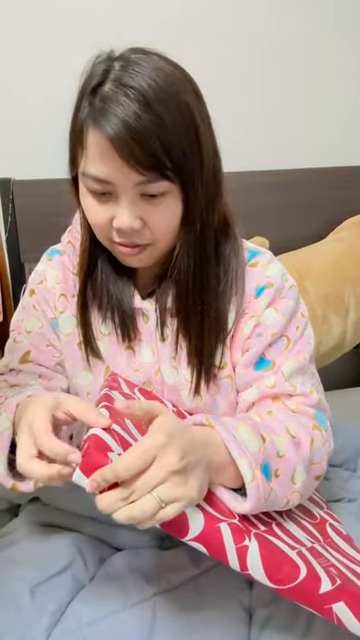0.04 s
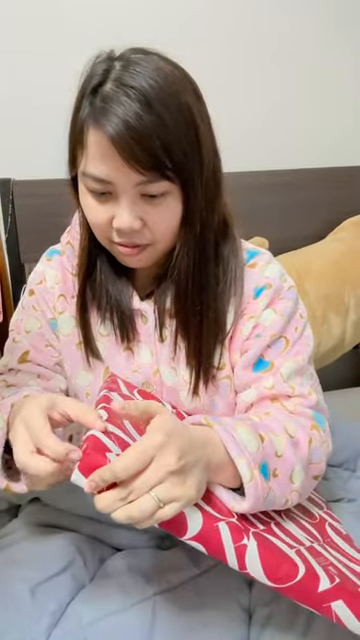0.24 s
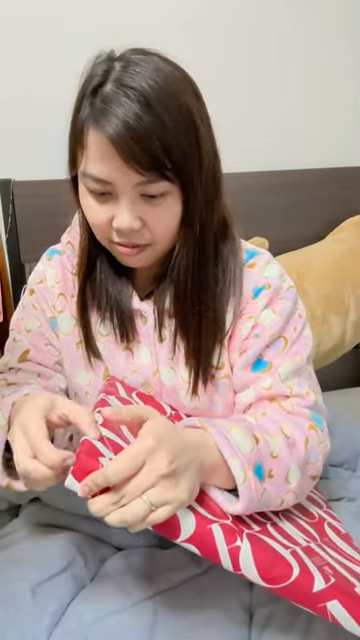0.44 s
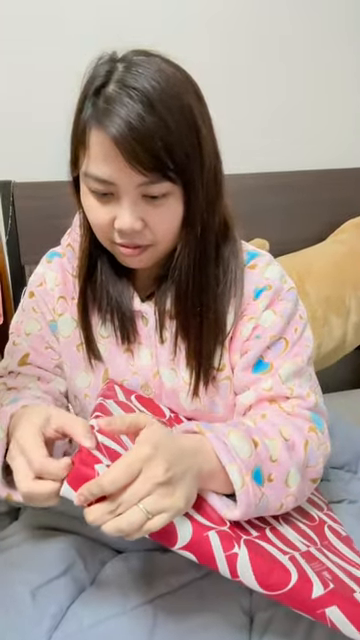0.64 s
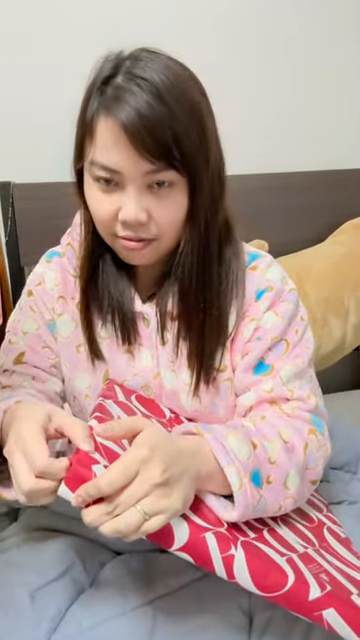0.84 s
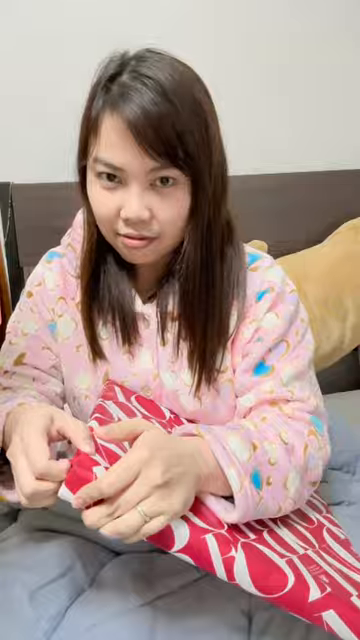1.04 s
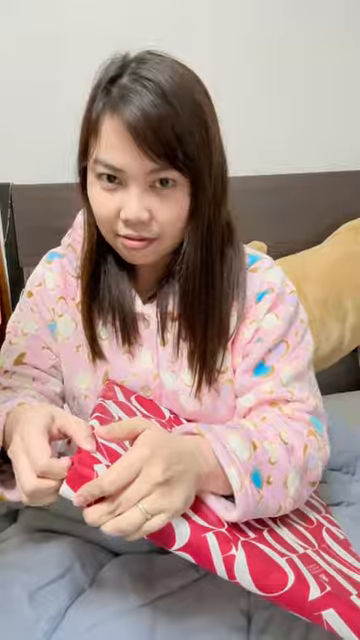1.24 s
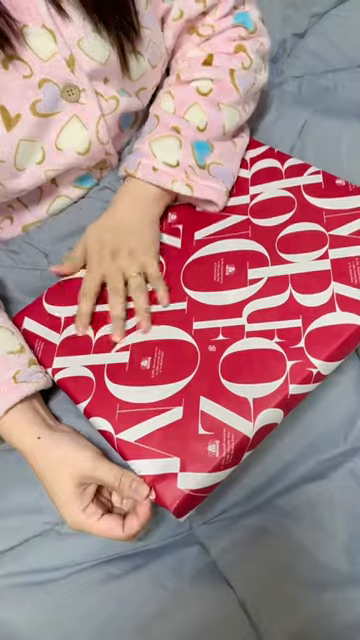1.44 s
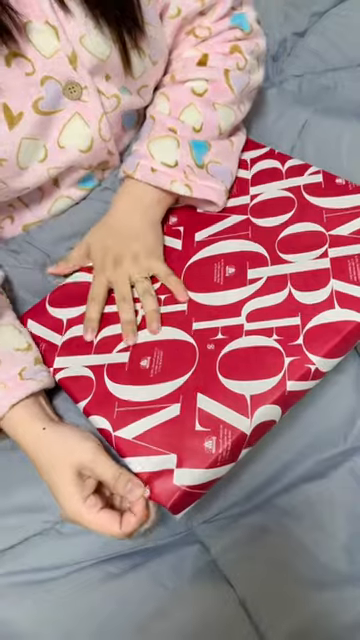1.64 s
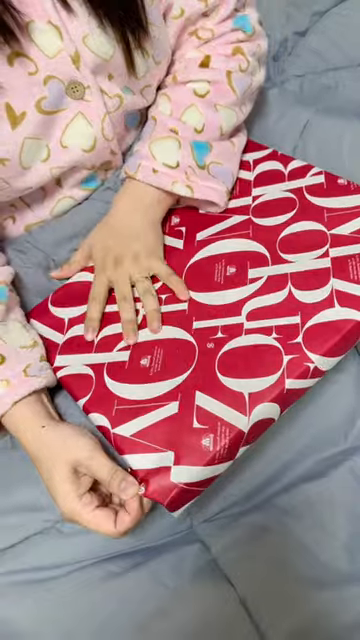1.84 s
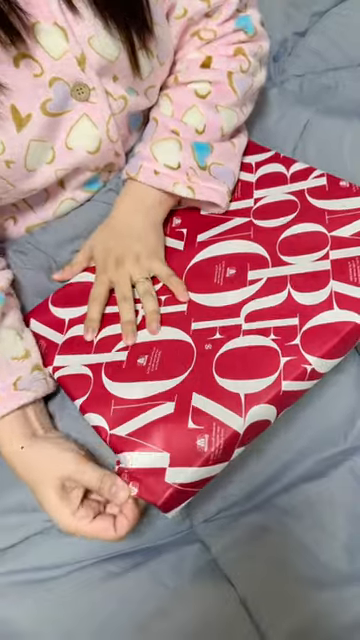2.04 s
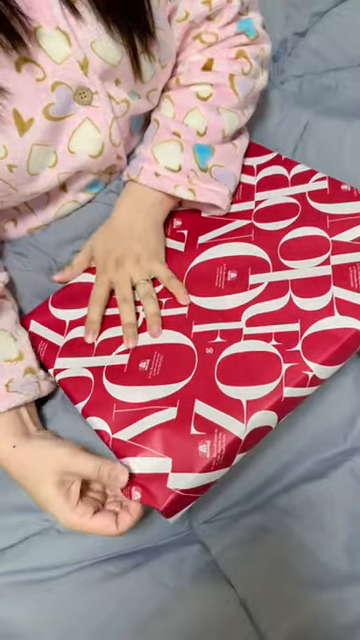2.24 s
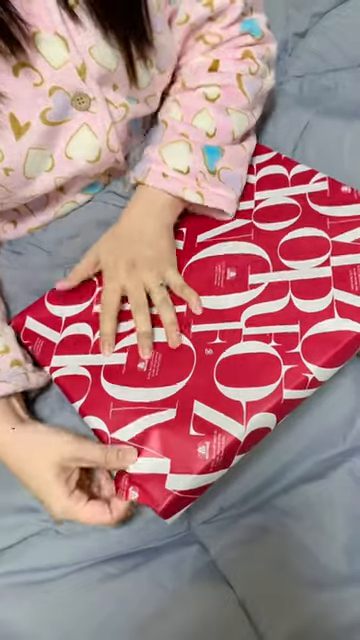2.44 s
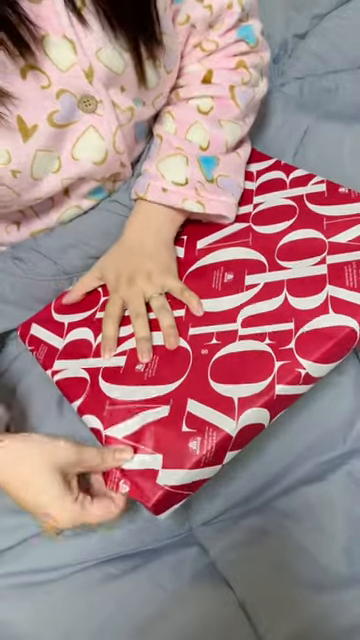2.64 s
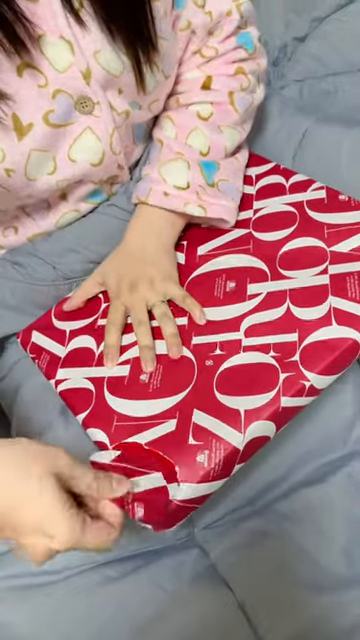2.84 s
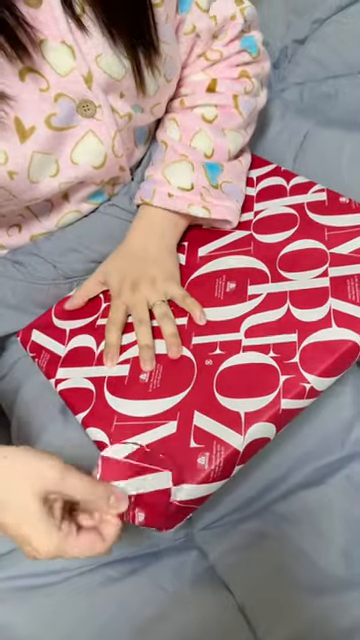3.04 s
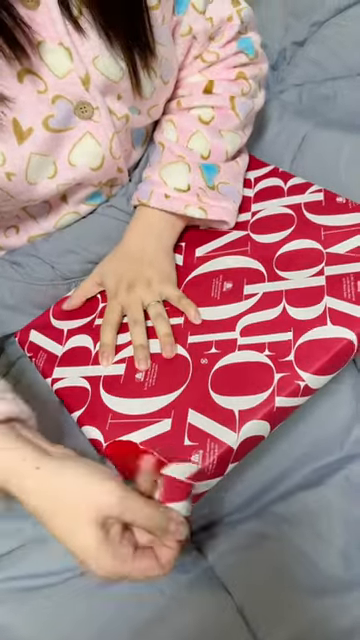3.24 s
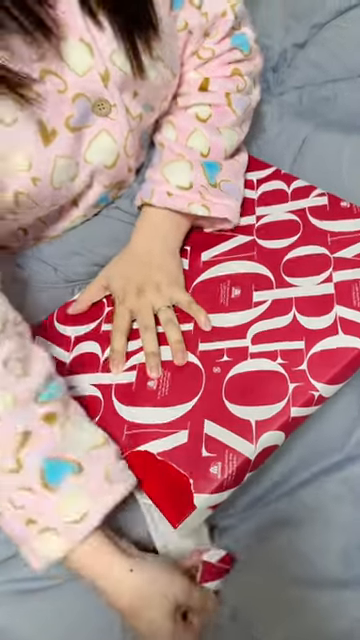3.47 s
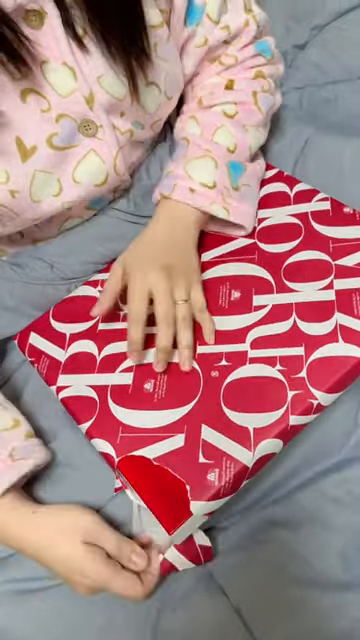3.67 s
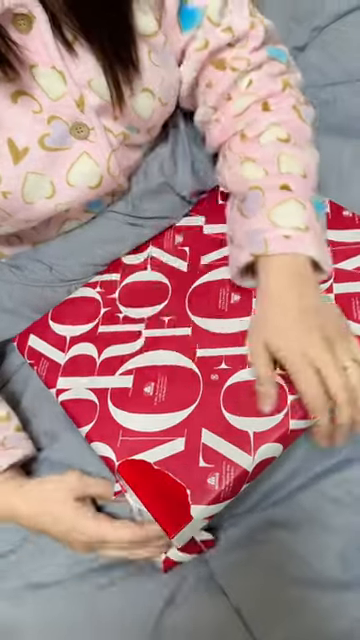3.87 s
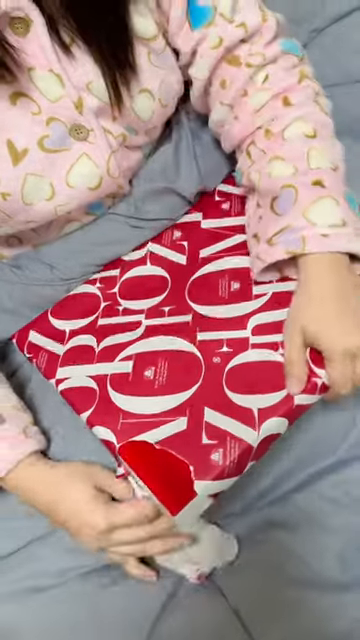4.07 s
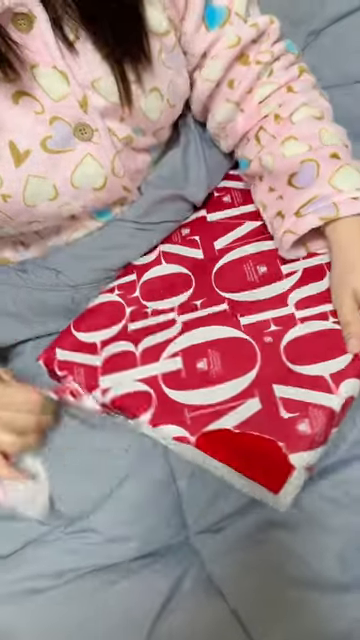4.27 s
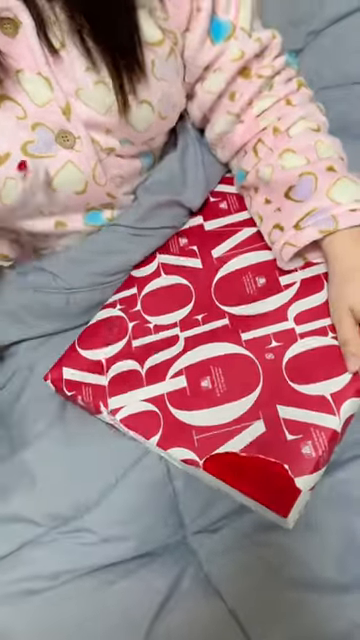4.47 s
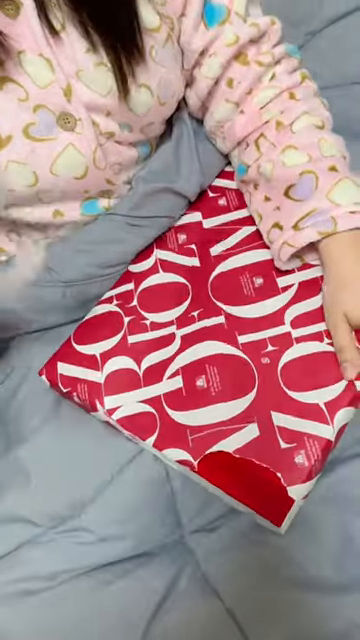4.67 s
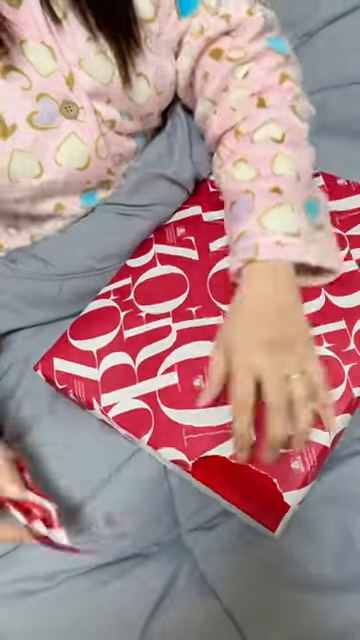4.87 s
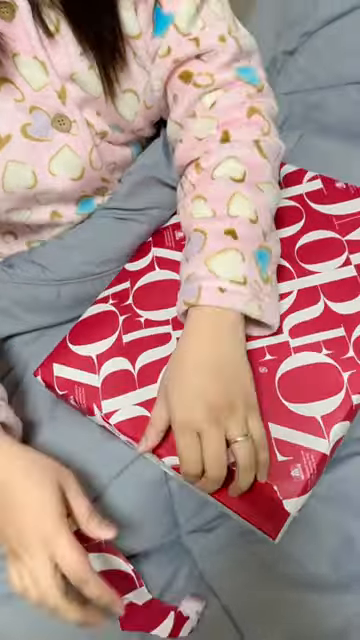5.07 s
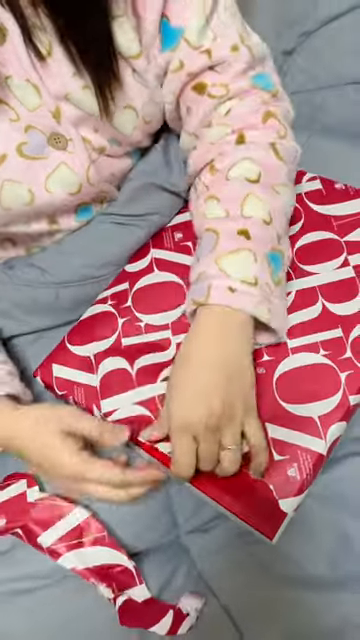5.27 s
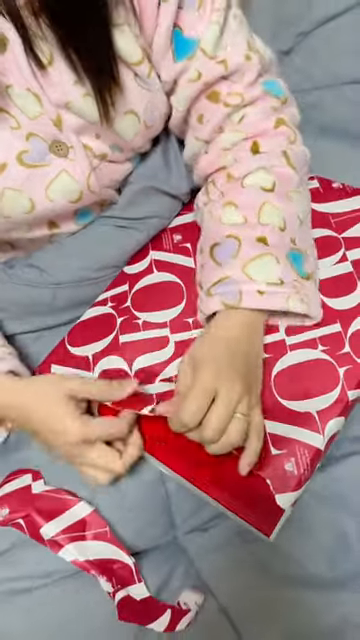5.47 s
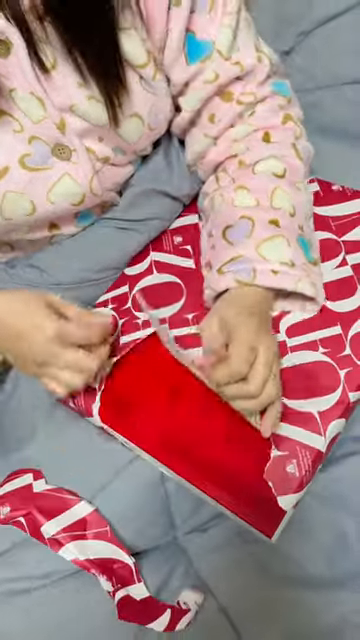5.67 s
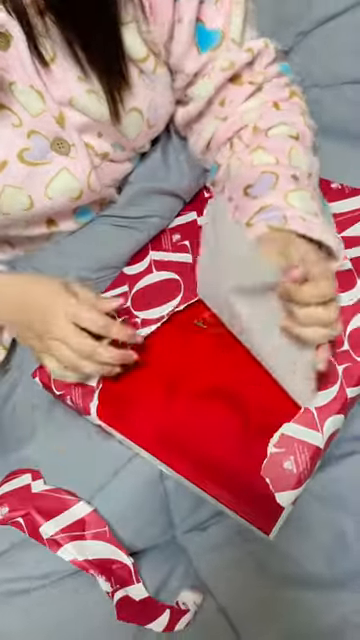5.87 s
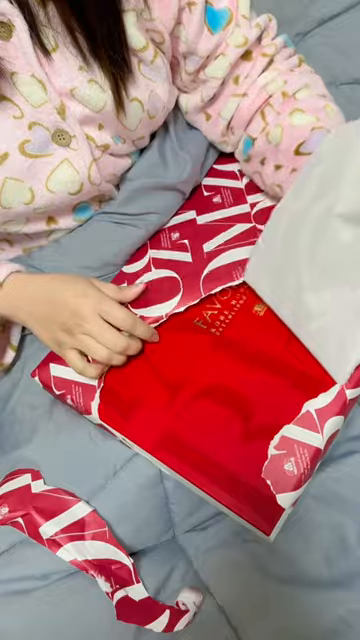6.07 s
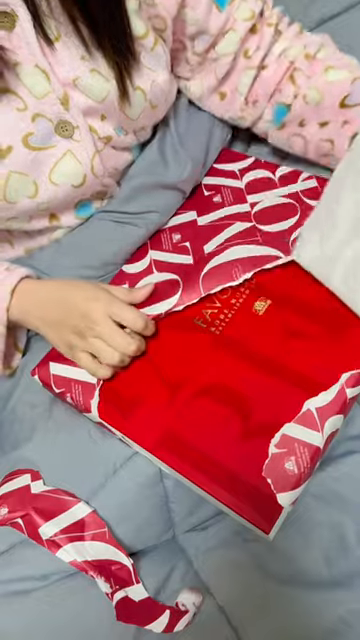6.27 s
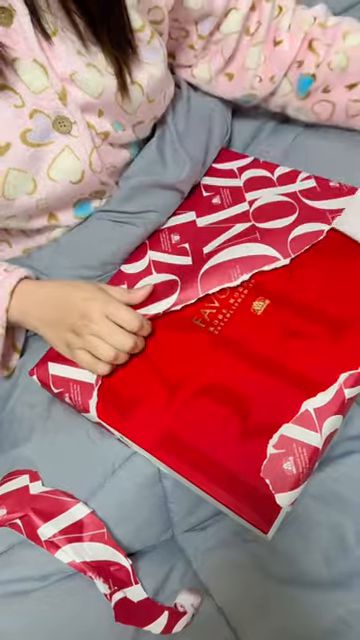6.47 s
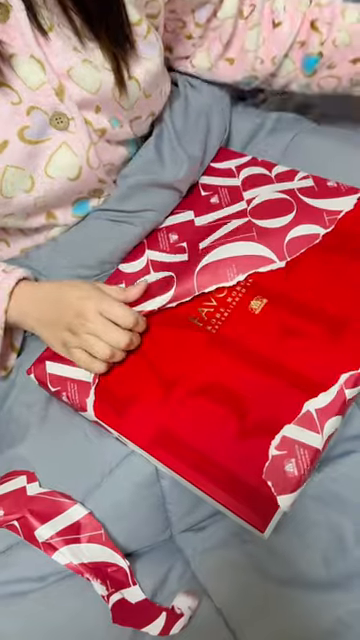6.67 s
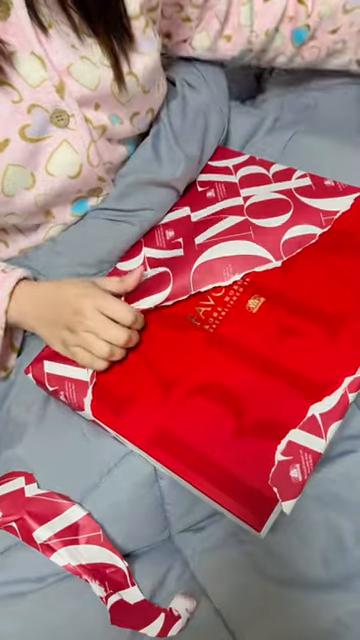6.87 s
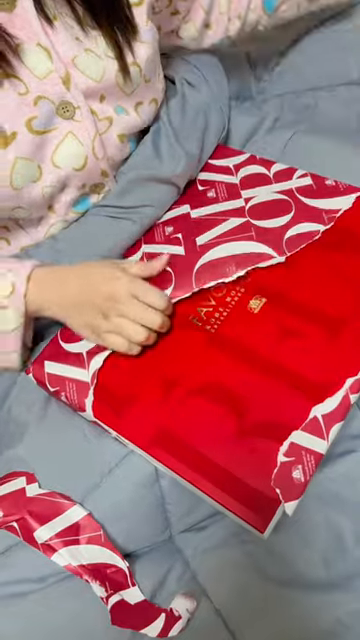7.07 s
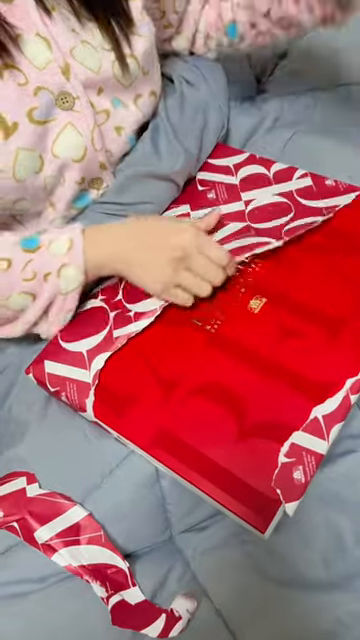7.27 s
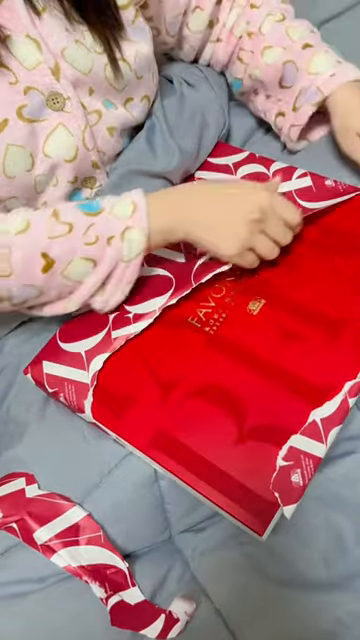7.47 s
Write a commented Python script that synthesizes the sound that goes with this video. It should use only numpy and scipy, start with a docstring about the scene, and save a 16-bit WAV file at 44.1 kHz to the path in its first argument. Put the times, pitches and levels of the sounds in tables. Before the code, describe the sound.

Fingers crinkle and pick at stiff wrapping paper on a cardboard box, then rip it in short bursts and one long tear in a quiet room.

```python
"""A dry room with a bed and soft walls: fingers pick at the wrapping paper on a flat cardboard box,
then tear it off in short and long rips. Fibres break as dense grains of noise, creases snap as ticks
with a short ring, and the box booms and knocks through low resonances, over a low building murmur.
A two-port microphone hears it from the side first, then, after a very short silence, from above."""
import sys
import numpy as np
from scipy import signal
from scipy.fft import rfft, irfft, next_fast_len
from scipy.io import wavfile
from scipy.ndimage import uniform_filter1d

SR = 44100
rng = np.random.default_rng(int(sys.argv[2]) if len(sys.argv) > 2 else 0)


def to_wav(sig):
    """Store sig (one row per channel, or 1-D mono) as 16-bit WAV at the path in sys.argv[1].

    Samples outside -1..1 are clipped; the rate is SR.
    """
    pcm = np.clip(np.atleast_2d(sig), -1, 1) * 32767
    pcm = np.round(pcm).astype(np.int16)
    wavfile.write(sys.argv[1], SR, pcm.T)  # frames by channels


N = 331191
SIZE = next_fast_len(N + SR)   # FFT length, with room for tails
CUTOFF_HZ = 16300   # top of the sound

# Borders between the parts: box below BOX_HZ, slack sheet up to SLACK_HZ, tight sheet up to HISS_HZ,
# single fibres above that
BOX_HZ, SLACK_HZ, HISS_HZ = 545, 1465, 6050
STRIP_DB, UPPER_DB = 5, 0   # usual lift of the loudest region and of the upper patch


def from_db(db):
    """Turns a level in dB into a gain."""
    return 10 ** (np.asarray(db) / 20)


def rms_one(x):
    """Scales a signal to unit power."""
    return x / np.sqrt(np.mean(x ** 2) + 1e-20)


def over_hz(rows):
    """Reads the columns of a frequency table at every FFT bin, evenly along pitch."""
    hz, *columns = np.transpose(rows)
    bins = np.log(np.maximum(np.fft.rfftfreq(SIZE, 1 / SR), 1))
    return [np.interp(bins, np.log(hz), c) for c in columns]


def over_time(t, rows):
    """Reads the columns of a time table at the times t."""
    s, *columns = np.transpose(rows)
    return [np.interp(t, s, c) for c in columns]


def causal(db):
    """Makes a filter with this level curve that never sounds early (minimum phase)."""
    cepstrum = irfft(db * np.log(10) / 20, SIZE)
    cepstrum[1:SIZE // 2] *= 2
    cepstrum[SIZE // 2 + 1:] = 0
    return np.exp(rfft(cepstrum))


def band(x, hz, kind):
    """Keeps one frequency range, with a third-order Butterworth design."""
    return signal.sosfilt(signal.butter(3, hz, kind, fs=SR, output="sos"), x)


def resonance(x, hz, width_hz):
    """Rings at one pitch like a damped spring: two poles, gain about 1 at the top."""
    r = np.exp(-np.pi * width_hz / SR)
    top = (1 - r * r) / 2
    return signal.lfilter([top, 0, -top], [1, -2 * r * np.cos(2 * np.pi * hz / SR), r * r], x + 1e-18)


def drift(rate):
    """Smoothed noise of rms 1; a higher rate wanders faster."""
    size = round(SR / rate / 4)
    once = uniform_filter1d(rng.standard_normal(N), size=size)
    return rms_one(uniform_filter1d(once, size=size))


def patchy(x, low_hz, high_hz, patchy_db):
    """Four neighbouring bands, each swelling and fading on its own as the folds move."""
    edges = np.geomspace(low_hz, high_hz, num=5)
    return sum(from_db(patchy_db * drift(14)) * band(x, [low, high], "band")
               for low, high in zip(edges, edges[1:]))


def swell_db(t, s, swell_s, hold_s, fade_s):
    """Level under the top of a gesture: straight up in dB, flat, straight down."""
    range_db = 29.5   # covered in one swell or fade time; the slopes then go on
    before = (s - t) / max(swell_s, .002)
    after = (t - s - hold_s) / max(fade_s, .002)
    return -range_db * np.maximum(np.maximum(before, after), 0)


def rumble():
    """The low murmur of the building: shaped noise, nearly the same at both ports."""
    # Shape of the murmur: (frequency [Hz], relative level [dB])
    murmur_shape = [(15, -55.5), (25, -31), (42, -9), (64, -9), (85, -21), (134, -18), (900, -43),
                    (1170, -68), (1980, -120)]
    level_db, = over_hz(murmur_shape)
    noise = rfft(rng.standard_normal((2, N)), SIZE)
    common, apart = irfft(noise * from_db(level_db), SIZE)[:, :N]
    return from_db(-73.5) * rms_one(common + .15 * apart * [[1], [-1]])


def fumbling(t):
    """Fingers fumble at the wrapping: the rustle level wanders and is never switched off."""
    # Path of the fumbling, before the layer gains in rustle():
    # (time [s], rustle level [dB], box boom over rustle [dB], fibre hiss over rustle [dB])
    fumble_path = [(0.0, -67.5, 4, -15), (0.39, -62, -0.5, -12.5), (0.599, -60, 1, -15),
                   (0.86, -75, -2.5, -12.5), (1.35, -82, 4, -14), (1.37, -59, -7.5, -7),
                   (1.74, -64.5, -1.5, 8), (1.93, -70, -7, -3), (2.157, -69.5, -14, -5),
                   (2.36, -57.5, 0, -4), (2.57, -56.5, 5, 3.5), (2.798, -51.5, 11.5, -4),
                   (3.0, -73.5, -31, -19), (3.22, -70, 9, -24), (3.46, -49.5, 6.5, -6),
                   (3.7, -56, -0.5, 0.5), (3.83, -63.5, -1.5, -1), (3.92, -51.5, -3, 1.5),
                   (4.05, -54, -11, -1), (4.52, -61.5, 5, -4), (4.65, -54.5, -2, -16), (4.87, -66.5, 0, -3),
                   (5.09, -67.5, 6.5, -5), (5.15, -49.5, -2, 0), (5.24, -63, 6.5, -2),
                   (5.38, -55.5, -9.5, -11), (6.75, -47.5, 4.5, -22), (6.95, -66, -4, -7),
                   (7.06, -54.5, -1.5, 1.5), (7.24, -47.5, -11, -4), (7.35, -47, -13, -5),
                   (7.51, -44, -7, -7)]
    # Where the sheet sounds loudest under the fingers: (time [s], frequency [Hz])
    finger_region = [(0.0, 2300), (0.6, 3880), (1.0, 2200), (1.4, 4130), (1.75, 3220), (2.6, 3420),
                     (2.95, 2120), (3.5, 2900), (3.95, 2310), (4.45, 4000), (4.6, 2600), (5.2, 3200),
                     (6.95, 2320), (7.5, 2800)]
    level_db, boom_db, hiss_db = over_time(t, fumble_path)
    region_hz, = over_time(t, finger_region)
    return dict(level_db=level_db, region_hz=region_hz, grain_db=2, slack_db=-9.5, boom_db=boom_db,
                hiss_db=hiss_db, thud_db=-15, strip_db=STRIP_DB, upper_db=UPPER_DB)


def fibres(grain_db, clumps):
    """Fibres break at random with uneven force, in clumps; gives their power, near 1 on average."""
    breaks_per_s = 2200
    born = rng.random(N) < breaks_per_s / SR
    unevenness = np.minimum(rng.exponential(1, N), 5) + clumps
    force = born * from_db(np.clip(grain_db, 0, 5) * unevenness)
    spread = signal.lfilter([.1], [1, -.9], force ** 2)   # a break lasts a few tenths of a millisecond
    return spread / uniform_filter1d(spread + 1e-9, size=3000)


def box(x):
    """The cardboard answers in a few broad modes on top of everything below BOX_HZ."""
    # Modes of the box: (frequency [Hz], width [Hz], level [dB])
    box_modes = [(120, 90, -5), (208, 154, -1), (337, 26, -1.5), (477, 89, -1.5)]
    modes = sum(from_db(db) * resonance(x, hz, width) for hz, width, db in box_modes)
    return band(x, BOX_HZ, "low") + modes


def handling():
    """Adds all gestures in power: gains of the five parts; the character follows the loudest gesture."""
    t = np.arange(0, N, 32) / SR   # a coarse time grid is enough for gestures
    gestures = [fumbling(t), tear(t), *rips(t)]
    powers = [from_db(2 * g["level_db"]) for g in gestures]
    sheet = sum(powers)
    slack, boom, hiss, thud = [sum(from_db(2 * (g["level_db"] + g[part])) for g in gestures)
                               for part in ("slack_db", "boom_db", "hiss_db", "thud_db")]
    gains = np.sqrt([sheet, slack, boom, hiss, thud + bedding_thuds(t)])
    character = [sum(power * g[trait] for power, g in zip(powers, gestures)) / sheet
                 for trait in ("region_hz", "grain_db", "strip_db", "upper_db")]
    return [np.interp(np.arange(N) / SR, t, c) for c in (*gains, *character)]


def rustle():
    """Breaks shake sheet, torn edge, box and bedding. Two rows: direct sound and its scattered twin."""
    (sheet_gain, slack_gain, boom_gain, hiss_gain, thud_gain,
     strip_hz, grain_db, strip_db, upper_db) = handling()
    strip_octaves = 0.51   # how broadly the loudest region stands out
    upper_hz, upper_octaves = 4150, 0.074   # a smaller patch near the torn edge rings higher up
    clumps = 0.87 * drift(31)
    whole = fibres(grain_db, clumps) + 0.31   # breaks over a steady floor
    breaks = rng.standard_normal((2, 2, N)) * np.sqrt(whole)
    edges = np.geomspace(SLACK_HZ, HISS_HZ, num=12)
    sheet = 0
    for low, high in zip(edges, edges[1:]):
        # each patch between folds has breaks of its own too, and swells and fades as the folds move
        patch_power = 0.15 * whole + 0.16 * fibres(grain_db, clumps)
        patch = rng.standard_normal((2, N)) * np.sqrt(patch_power)
        middle_hz = np.sqrt(low * high)
        near = np.exp(-(np.log2(middle_hz / strip_hz) / strip_octaves) ** 2)
        upper = np.exp(-(np.log2(middle_hz / upper_hz) / upper_octaves) ** 2)
        folds_db = 1.5 * (drift(9.5) + 0.98 * drift(35) + 0.49 * drift(150))
        patch_gain = from_db(strip_db * near + upper_db * upper + folds_db)
        sheet = sheet + patch_gain * band(patch, [low, high], "band")
    slack = slack_gain * from_db(7.5) * patchy(breaks[0], BOX_HZ, SLACK_HZ, patchy_db=2.06)
    edge = hiss_gain * from_db(2.0) * patchy(breaks[1], HISS_HZ, CUTOFF_HZ, patchy_db=1.5)
    boom = boom_gain * from_db(5.0) * box(breaks[1])
    thud = thud_gain * from_db(24.5) * band(breaks[0], 117, "low")
    return from_db(5.0) * (sheet_gain * sheet + slack + edge + boom + thud)


def rips(t):
    """Crinkles and short rips: each rustle swells to a top, holds and fades."""
    # Single pulls, before the layer gains in rustle():
    # (time of the top [s], rustle level [dB], swell [s], hold [s], fade [s], loudest region [Hz],
    #  slack sheet over rustle [dB], box boom over rustle [dB], fibre hiss over rustle [dB])
    pulls = [(0.074, -62.5, 0.16, .001, 0.085, 2400, -7, -9.5, -11),
             (0.256, -65, 0.13, .001, 0.052, 3420, -9, 12.5, -6.5),
             (0.423, -36, 0.026, .001, 0.057, 3850, -11.5, -20.5, -11),
             (0.476, -35.5, 0.11, .001, 0.11, 3740, -16, -7.5, -13.5),
             (0.709, -66.5, 0.16, 0.014, 0.21, 3110, -9, 12, -6),
             (1.445, -59.5, 0.11, 0.037, 0.08, 4400, -22, -10, -11.5),
             (1.594, -52.5, 0.054, 0.097, 0.35, 3200, -11.5, -12, 4),
             (1.774, -48, 0.12, .001, 0.13, 2450, -29, -14, 2.5),
             (1.87, -51, 0.087, .001, 0.18, 3150, -33, -25, 4.5),
             (2.004, -37.5, 0.087, 0.0011, 0.11, 3100, -26, -9.5, 1),
             (2.19, -53.5, 0.024, 0.0094, 0.044, 3060, -2.5, -14.5, -14.5),
             (2.258, -43, 0.081, 0.0012, 0.118, 3060, -14, -4, -2),
             (2.4, -53, 0.011, 0.0012, 0.059, 2500, -10, 8, 10.5),
             (2.474, -37, 0.02, 0.0011, 0.047, 3400, -0.5, 5.5, -11.5),
             (2.62, -31.5, 0.017, 0.00074, 0.051, 3280, -19, -10, 7.5),
             (2.652, -17.5, 0.012, 0.041, 0.064, 3040, -9, -6.5, -3),
             (2.899, -51.5, 0.37, 0.00091, 0.2, 2400, -4.5, -5, -16),
             (3.039, -57.5, 0.045, 0.065, 0.26, 2260, 1, 3.5, -19),
             (3.229, -32, 0.0045, 0.00089, 0.034, 2700, -10, -16, 9),
             (3.309, -29.5, 0.085, 0.051, 0.08, 2880, -9.5, -8, -2),
             (3.371, -28.5, .04, 0.034, 0.072, 1990, -5, -4.5, 2),
             (3.501, -49, 0.11, 0.00092, 0.21, 2700, 1, -9, 9),
             (3.741, -62, 0.083, .001, 0.2, 2670, -11, -14, 7.5),
             (3.953, -53.5, 0.11, .001, 0.46, 2110, 2, -3, -3),
             (4.16, -33, 0.15, 0.073, 0.11, 3400, -6, -3.5, 2.5),
             (4.245, -29, 0.135, 0.03, 0.15, 3240, -9.5, -4.5, 6.5),
             (4.33, -35, 0.25, 0.045, 0.057, 3870, -13, -7.5, -2.5),
             (4.56, -51, 0.025, 0.0012, 0.034, 2640, -12, 1, -6),
             (4.715, -46, 0.15, 0.00089, 0.066, 2570, -8.5, -6, -1),
             (4.781, -48.5, 0.062, 0.0012, 0.08, 2580, -8, -6, 3),
             (4.904, -55.5, 0.042, .001, 0.026, 2610, -2, -16.5, -2.5),
             (5.031, -60, 0.067, .001, 0.075, 2530, -6, 1, -15),
             (5.104, -30.5, 0.0055, 0.012, 0.017, 2760, -14.5, -32, -30),
             (5.334, -39, 0.12, 0.0011, 0.1, 3560, -16, -13.5, 2.5),
             (6.987, -37.5, 0.035, 0.011, 0.074, 2250, -10.5, -14, -18),
             (7.15, -52, 0.19, 0.075, 0.075, 2840, 1, -1.5, -16),
             (7.254, -37, 0.01, 0.018, 0.053, 2870, -9, -12, -17),
             (7.45, -33.5, 0.01, .001, 0.032, 2800, -9, -10, -16)]
    # The hardest pulls break fibres more evenly: (rustle level [dB], graininess [dB], later held to 0-5)
    pull_grain = [(-69.5, -1.5), (-53.5, 5.5), (-43, 9.5), (-35.5, 1.6)]
    gestures = []
    for s, db, swell, hold, fade, hz, slack_db, boom_db, hiss_db in pulls:
        grain_db = np.interp(db, *np.transpose(pull_grain))
        level_db = db + swell_db(t, s, swell, hold, fade)
        gestures.append(dict(level_db=level_db, region_hz=hz, grain_db=grain_db, slack_db=slack_db,
                             boom_db=boom_db, hiss_db=hiss_db, thud_db=-28.5,
                             strip_db=STRIP_DB, upper_db=UPPER_DB))
    return gestures


def bedding_thuds(t):
    """The box thuds on the bedding: the power of each low push swells and fades evenly."""
    # Thuds, before the layer gains in rustle(): (time [s], level [dB], swell and fade each [s])
    thud_rows = [(0.256, -62, 0.12), (1.451, -59, 0.076), (2.45, -48, 0.06), (2.516, -45, 0.09),
                 (2.652, -32.5, 0.017), (2.76, -55, 0.18), (3.46, -48.5, 0.11), (3.905, -52, 0.25),
                 (4.25, -30, 0.05), (4.75, -56.5, 0.23), (5.003, -50, 0.078), (5.234, -53, .1)]
    return sum(from_db(2 * (db + swell_db(t, s, length, 0, length))) for s, db, length in thud_rows)


def snaps():
    """A crease flips: a broad tick, a short ring of the patch around it and a crumbling tail."""
    # Creases that snap: (time [s], level before room and microphone [dB], pitch of the patch [Hz],
    #  tick over that level [dB])
    creases = [(0.4014, -27.5, 5900, 1.5), (0.419, -17, 3327, -3.5), (0.4222, -21.5, 4234, 5.5),
               (0.442, -23.5, 5260, 5), (0.4684, -13, 4150, -1), (0.4691, -8, 4400, -0.5),
               (0.4694, -18, 1082, -16.5), (0.7135, -52, 6200, 12.5), (0.781, -44, 4300, -21),
               (1.3668, -36.5, 3770, -6.5), (1.374, -44, 4000, -11.5), (1.378, -40.5, 3920, -13),
               (1.579, -40, 3500, -6), (1.5857, -37, 4130, -3), (1.5924, -36.5, 3880, 13.5),
               (1.666, -30, 2670, -3), (1.770, -24, 2230, -10), (1.813, -42.5, 4300, 6.5),
               (1.86, -27.5, 4270, -6), (1.982, -21, 3040, -6), (2.001, -13, 3000, -3),
               (2.022, -19.5, 2600, 2), (2.182, -43, 3950, 5), (2.2313, -27, 1770, -15),
               (2.254, -19, 4160, -5), (2.2553, -20, 1800, -10), (2.265, -33, 1770, 1),
               (2.4, -38.5, 2500, 12), (2.4702, -19, 2880, -2), (2.472, -16, 3620, -12),
               (2.4733, -22, 3830, -6), (2.549, -44, 4000, 5), (2.6146, -21, 4000, -2.5),
               (2.618, -13.5, 4120, -5.5), (2.6226, -20, 3900, -10.5), (2.6484, -7.5, 2910, 0),
               (2.6576, -19, 1170, -10), (2.6614, -1.5, 3020, -3.5), (2.662, -7, 4020, -17),
               (2.7057, -2.5, 1295, -18), (2.8, -24, 1920, -26), (3.0685, -26, 2020, -35),
               (3.2291, -21.5, 2600, 11), (3.267, -22, 3020, 0), (3.279, -18, 2920, -17),
               (3.305, -20, 1935, -3), (3.329, -26, 3600, -1), (3.3676, -18, 2500, -9.5),
               (3.371, -16, 1900, -12), (3.378, -12, 1800, -12), (3.393, -17, 1570, -4),
               (3.397, -18.5, 4100, -1), (3.481, -31, 3430, -3), (3.488, -28.5, 4200, 4),
               (3.523, -31.5, 4000, -1), (3.581, -27.5, 3100, 1.5), (3.7318, -25.5, 1690, 7.5),
               (3.847, -42, 3250, 12.5), (3.946, -27, 1740, 9.5), (4, -24, 1700, -11),
               (4.1125, -26.5, 3880, -1), (4.074, -31, 2000, -7), (4.1584, -16, 3290, -5),
               (4.233, -7.5, 2800, -10), (4.2345, -21, 1720, -10), (4.248, -17.5, 2990, 2.5),
               (4.382, -23, 4200, -9.5), (4.5464, -19.5, 2650, -3), (4.604, -39.5, 1490, -3),
               (4.64, -39, 2010, -5), (4.677, -44, 3000, 10), (4.705, -34, 2480, 0), (4.7688, -7, 2550, -8),
               (5.1012, -16, 3120, -30), (5.1101, -14.5, 2400, -33), (5.1592, -34.5, 4400, 9),
               (5.255, -37, 3000, -1), (5.2666, -31.5, 3140, 5), (5.2926, -31, 2730, 6.5),
               (5.319, -28, 3270, -5), (5.3315, -20, 3050, -10), (5.3909, -5.5, 4160, -19),
               (5.3913, -1.5, 3330, -15), (5.5, -9, 3000, -4), (5.607, -12, 3980, -9),
               (5.61, -5.5, 2420, -14), (6.275, -11, 2610, -10), (6.3216, -11, 2645, -20),
               (6.36, -15, 2490, -20), (6.788, -24, 1310, 1), (6.827, -32, 2200, -13),
               (6.9744, -34.5, 2500, -12), (6.9902, -20.5, 1750, -14), (7.0054, -21.5, 3640, -8),
               (7.008, -26, 1700, -6), (7.085, -33.5, 1550, -13), (7.1436, -24.5, 2020, -16),
               (7.1442, -26, 4100, -20), (7.196, -28, 2820, -11), (7.2168, -28, 4070, -19),
               (7.2535, -30, 2400, -3), (7.259, -26, 1900, -10), (7.267, -26, 2900, 1),
               (7.277, -25, 5700, -18), (7.284, -27, 1510, -1), (7.3021, -23.5, 2350, -23),
               (7.305, -20.5, 2500, -11), (7.3652, -15.5, 2400, -19), (7.366, -30, 4270, -19),
               (7.3868, -18.5, 2720, -21), (7.425, -16, 2740, -23), (7.4472, -17, 2660, -24),
               (7.4476, -21, 4030, -21), (7.4605, -30, 5300, -10)]
    # times to fall by 60 dB
    tick_t60_s, ring_t60_s, overtone_t60_s, crumble_t60_s = 0.0065, 0.0049, 0.0025, 0.012
    length = 4000   # samples
    out, span = np.zeros((2, N + length)), np.arange(length) / SR
    noise = rng.standard_normal((len(creases), 2, 2, length))
    rise = np.square(1 - np.exp(-span / 0.00015))   # the crease runs along its length before it lets go
    quarter_turn = np.array([[0], [np.pi / 2]])   # between the direct and the scattered row
    for (s, db, hz, edge_db), (tick, crumble) in zip(creases, noise):
        tick = from_db(edge_db) * tick * from_db(-60 * span / tick_t60_s)
        ring = np.sin(2 * np.pi * hz * span + quarter_turn) * from_db(-60 * span / ring_t60_s)
        overtone = np.sin(2 * np.pi * 1.5 * hz * span + quarter_turn)
        ring = ring + from_db(-10 - 60 * span / overtone_t60_s) * overtone
        tail = from_db(-3) * resonance(crumble, hz, 2500) * from_db(-60 * span / crumble_t60_s)
        start = round(s * SR)
        out[:, start:start + length] += from_db(db) * rise * (1.26 * ring + tick + tail)
    return out[:, :N]


def knocks():
    """Sheet or finger bumps the box: a low tone and a puff of noise in one broad cardboard resonance."""
    # Bumps: (time [s], level before room and microphone [dB], pitch [Hz])
    bumps = [(0.421, -36.5, 275), (0.471, -28, 253), (1.987, -34, 588), (2.001, -36.5, 556),
             (2.254, -31.5, 520), (2.265, -53, 550), (2.446, -31, 223), (2.472, -32.5, 310),
             (2.649, -33.5, 640), (2.653, -19, 204), (3.066, -31.5, 560), (3.226, -30.5, 492),
             (3.28, -36, 252), (3.317, -27, 152), (3.374, -25, 336), (3.481, -27, 172), (3.731, -35, 242),
             (3.944, -34.5, 190), (4.153, -31, 199), (4.227, -18.5, 350), (4.548, -41.5, 603),
             (4.769, -39.5, 352), (5.03, -41, 506), (5.11, -38, 220), (5.256, -39.5, 370),
             (5.422, -38, 370), (7.005, -31.5, 212.6), (7.365, -38.5, 324), (7.448, -42, 303)]
    length = 6000   # samples
    out, span = np.zeros((2, N + length)), np.arange(length) / SR
    noise = rng.standard_normal((len(bumps), 2, length))
    # soft start, then a fall of 60 dB in 0.062 s
    shape = (1 - np.exp(-span / 0.0017)) * from_db(-60 * span / 0.062)
    for (s, db, hz), puff in zip(bumps, noise):
        tone = np.sin(2 * np.pi * hz * span) + 3.57 * resonance(puff, hz, 270)
        start = round(s * SR)
        out[:, start:start + length] += from_db(db) * shape * tone
    return out[:, :N]


def tear(t):
    """The long tear across the lid: one unbroken rip whose level and loudest region keep moving."""
    # Path of the tear, before the layer gains in rustle(): (time [s], rustle level [dB],
    #  loudest region [Hz], slack sheet over rustle [dB], box boom over slack sheet [dB])
    tear_path = [(5.384, -68, 3600, -19, -4), (5.398, -28, 3630, -16, -3), (5.436, -21.5, 3570, -18.5, 0),
                 (5.47, -25.5, 3500, -16.5, 2.5), (5.51, -24, 3000, -18, -2.5),
                 (5.562, -32, 2840, -10.5, -4), (5.59, -27.5, 2880, -14, -6), (5.628, -19.5, 2450, -16, -3),
                 (5.68, -25, 2770, -17.5, -1.5), (5.76, -26, 3400, -15, 3), (5.81, -26.5, 3320, -18.5, 6.5),
                 (5.86, -25.5, 3270, -12.5, -7), (5.93, -26, 2670, -16, 1), (5.98, -27, 2630, -7.5, -7.5),
                 (6.04, -24, 2650, -14.5, 0), (6.158, -25.5, 2550, -11, -2), (6.24, -26, 2600, -12, 0),
                 (6.274, -23, 2590, -13, 3), (6.295, -26.5, 2600, -10, -1), (6.335, -26, 2280, -9.5, -3.5),
                 (6.39, -26.5, 2260, -13.5, 0), (6.44, -25.5, 2400, -11.5, -4.5),
                 (6.504, -24.5, 2500, -13.5, -4.5), (6.582, -28, 2570, -13.5, 0),
                 (6.674, -28.5, 2370, -8, -5.5), (6.719, -22, 2200, -13, 2.5), (6.768, -36, 2700, -12, -10),
                 (6.80, -44.5, 2600, -8, -11), (6.878, -68, 2200, 5, 7)]
    # How much two regions stand out: (time [s], loudest region [dB], upper patch [dB])
    tear_focus = [(5.4, 8.5, -5), (5.48, 11, 0), (5.55, 6.5, 1), (5.6, 8, 7), (5.65, 7.5, 0), (5.72, 8, -1),
                  (5.85, 6.5, -4.5), (5.92, 5.5, 0.5), (6.0, 8.5, 8.5), (6.08, 6, 4.5), (6.15, 5, 2.5),
                  (6.25, 4.5, 3), (6.36, 12.5, 0.5), (6.5, 6, -1.5), (6.6, 6.5, 4), (6.72, 8, -2),
                  (6.8, 2.5, -6)]
    level_db, region_hz, slack_db, boom_db = over_time(t, tear_path)
    strip_db, upper_db = over_time(t, tear_focus)
    tearing = (t > tear_path[0][0]) & (t < tear_path[-1][0])
    level_db = np.where(tearing, level_db, -200)   # as good as silent outside the tear
    return dict(level_db=level_db, region_hz=region_hz, grain_db=0.23, slack_db=slack_db,
                boom_db=slack_db + boom_db, hiss_db=-3, thud_db=-40,
                strip_db=strip_db, upper_db=upper_db)


def room(x):
    """A dull, short tail of fading noise from walls and bedding, a few milliseconds late."""
    t60_s, late_s, cut_hz = 0.077, .006, 8100
    t = np.arange(SR // 3) / SR
    tail = rng.standard_normal((2, len(t))) * from_db(-60 * t / t60_s) * (t > late_s)
    tail = band(tail, cut_hz, "low")
    tail = tail / np.sqrt(np.sum(tail ** 2) / 2)
    return from_db(-17.5) * signal.fftconvolve(x, tail, axes=1)[:, :N]


def ports(x, colour, differ):
    """Both ports get the direct sound, turned in phase against each other, and scatter of opposite sign."""
    balance_db, lead, alike = over_hz(differ)
    direct, scatter = rfft(x, SIZE) * causal(*over_hz(colour))
    side = np.array([[.5], [-.5]])   # left, right
    shared = np.sqrt((1 + alike) / 2) * direct
    opposed = np.sqrt((1 - alike) / 2) * scatter * np.sign(side)
    turned = (shared + opposed) * from_db(side * balance_db) * np.exp(-1j * side * lead)
    return irfft(turned, SIZE)[:, :N]


def scene():
    """Paper in the room, heard from the side, then from above, with the murmur beneath."""
    # Paper as the microphone hears it from each place: (frequency [Hz], level [dB])
    colour_side = [(60, -9.5), (250, -3.5), (600, -4), (1000, 4.5), (1700, 4.5), (2700, 1.5), (4300, -1.5),
                   (6000, 7), (9000, 11.5), (11200, 2), (13000, 5), (15500, -2.5)]
    colour_above = [(40, -13), (220, 1), (700, -1), (1100, 1), (2100, 2), (2600, 5), (3300, 0.5),
                    (4250, 4.5), (4650, 1), (5100, -0.5), (5900, -0.5), (7000, -8.5), (8000, -5.5),
                    (10000, -6), (11300, -6.5), (12800, -4.5), (14500, -6), (15800, 2)]
    # How the two ports differ: (frequency [Hz], left over right [dB], phase lead of right [rad],
    #  likeness [0-1])
    ports_side = [(60, 0, 0, .92), (1100, 2, -.5, .6), (2000, -1, 0, .65), (2400, 1, 3, .8),
                  (3000, 2, 2.8, .65), (3500, 1, 0, .45), (4600, -1, .4, .3), (6000, 1, 1.9, .75),
                  (7200, 0, 3.05, 1), (8500, 0, 3.2, 1), (9800, .5, 5.3, .7), (10600, 0, 6.28, 1),
                  (12900, 0, 6.28, 1), (13700, .5, 7.7, .6), (14500, 0, 9.42, 1)]
    ports_above = [(60, 0, 0, .99), (300, 0, 0, .99), (650, -4, .1, .85), (1100, -5, -.2, .85),
                   (1900, -3, -.3, .8), (2800, 2, -.7, .35), (3400, 0, 0, .85), (4500, 0, -.1, .85),
                   (5000, 0, 2.2, .25), (5500, 0, .6, .4), (6000, 0, .8, .6), (7000, 0, 1.9, .3),
                   (7700, 1, 2.9, .75), (8800, .5, 2.4, .45), (9600, .5, 2.8, .7), (10100, 0, 3.142, 1),
                   (13500, 0, 3.142, 1), (14300, 0, 4, .75), (15800, -.5, 4.5, .6)]
    moved_s, silent_s = 1.364, 0.01   # the microphone changes place; all is mute just before
    paper = rustle() + snaps() + knocks()
    paper = paper + room(paper)
    t = np.arange(N) / SR
    first = ports(paper * (t < moved_s), colour_side, ports_side)
    then = ports(paper * (t >= moved_s), colour_above, ports_above)
    audible = (t < moved_s - silent_s) | (t >= moved_s)
    return (first + then + rumble()) * audible


def record(dry):
    """Rounds the highest peaks, then cuts the deepest bass and the top."""
    rounded = band(.95 * np.tanh(dry / .95), 42, "high")
    return signal.sosfilt(signal.cheby2(16, 70, CUTOFF_HZ, fs=SR, output="sos"), rounded)


dry = scene()
out = record(dry)
to_wav(out)
```